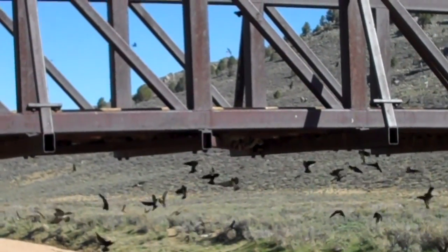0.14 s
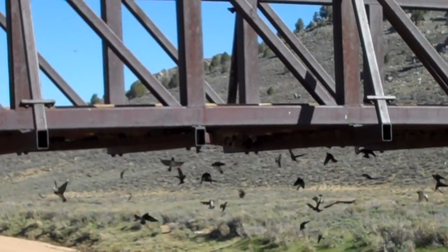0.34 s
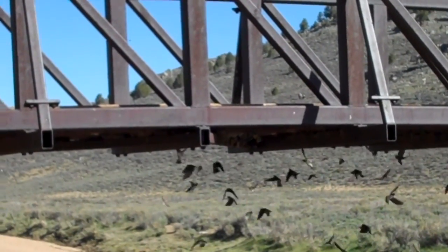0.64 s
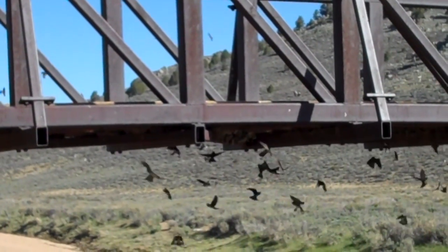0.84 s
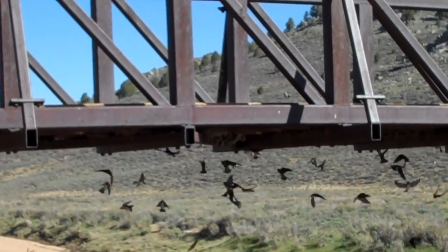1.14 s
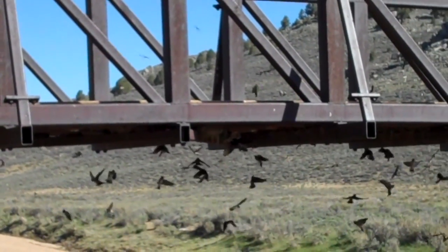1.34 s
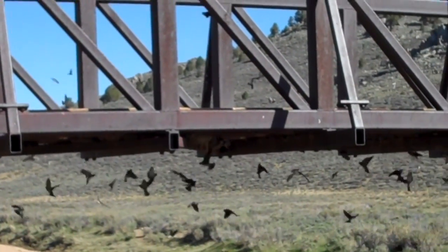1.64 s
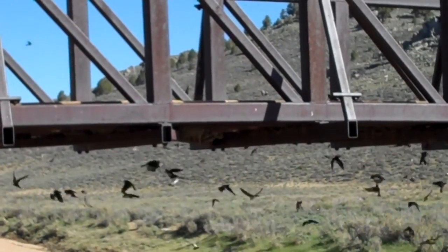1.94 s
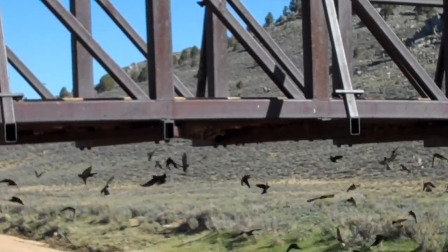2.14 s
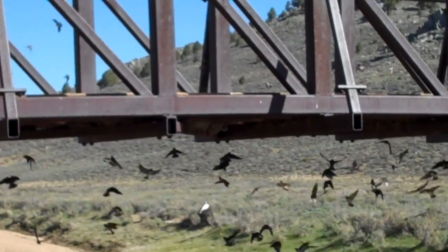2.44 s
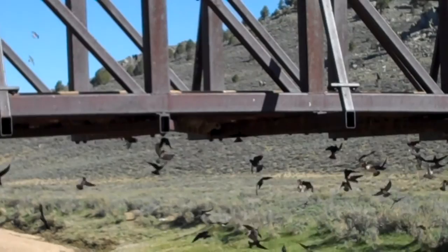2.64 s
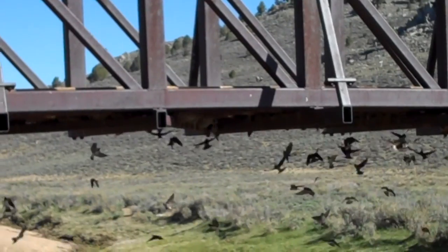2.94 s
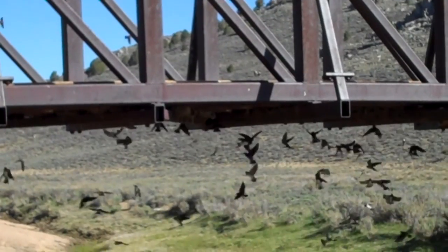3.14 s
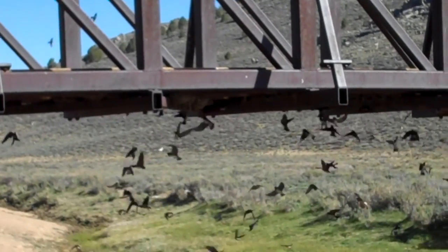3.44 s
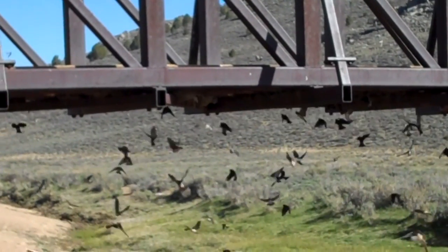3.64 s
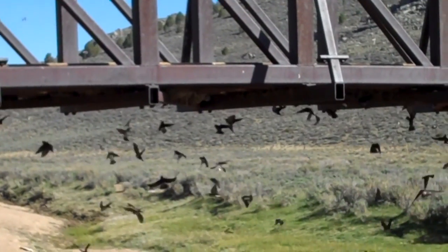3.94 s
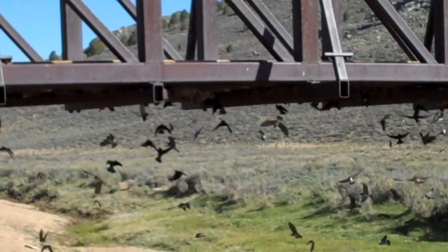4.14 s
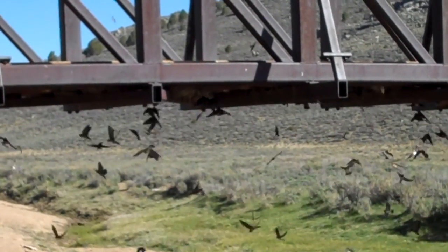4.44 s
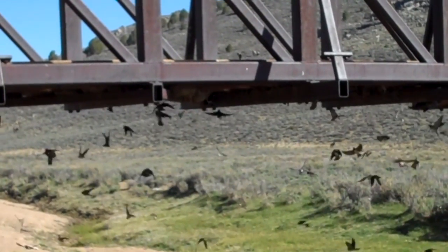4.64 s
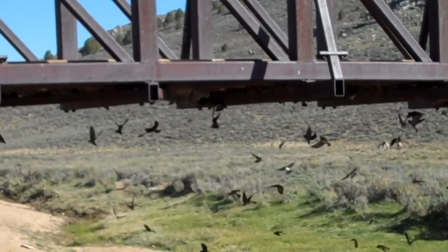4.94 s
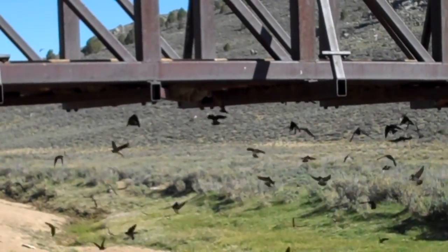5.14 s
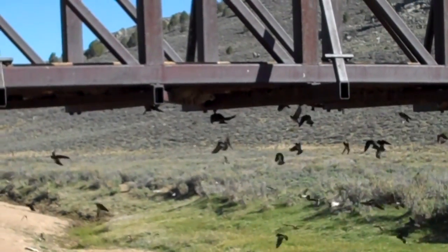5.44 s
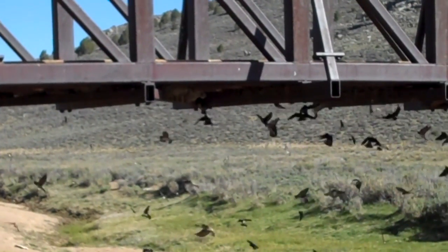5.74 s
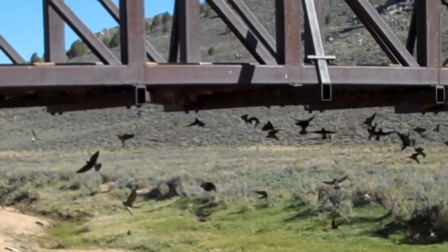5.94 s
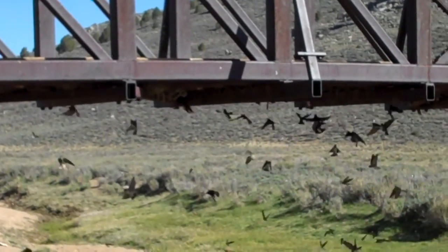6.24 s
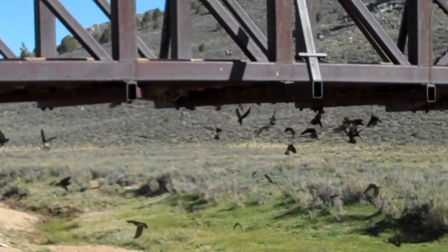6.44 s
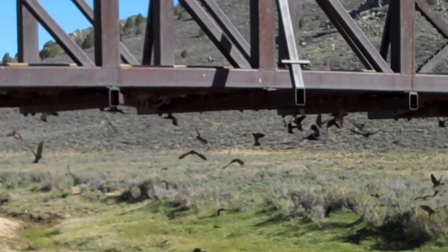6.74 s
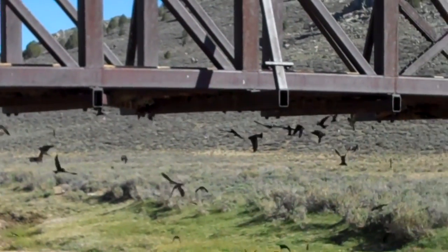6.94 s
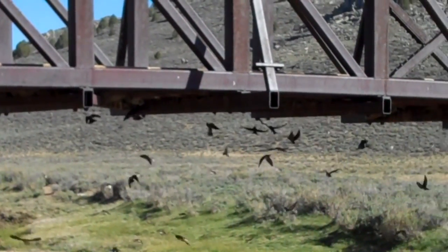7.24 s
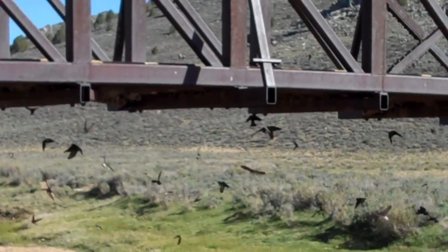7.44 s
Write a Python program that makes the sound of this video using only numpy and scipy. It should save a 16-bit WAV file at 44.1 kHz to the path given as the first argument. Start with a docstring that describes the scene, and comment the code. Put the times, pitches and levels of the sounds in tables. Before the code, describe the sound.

Dozens of swallows squeak, rasp and chirp all at once beneath a metal bridge, with faint ticks and light metallic tinks among them.

```python
"""Rasping calls of nearby cliff swallows stand over the chatter of a colony nesting under a steel bridge.
Each caller sounds both sides of its syrinx: two falling voices, their combination tones and a rough hiss.
One-voiced peeps, whines and chirps, a flock of shorter calls over shaped noise, and faint low notes fill in.
Noise-burst ticks, metallic tinks and one low knock punctuate; the girders echo the birds, ticks and tinks.
A soft outdoor rush of shaped noise lies beneath; both channels are the same."""
import sys
import numpy as np
from scipy import signal
from scipy.fft import rfft, irfft, next_fast_len
from scipy.io import wavfile
from scipy.ndimage import map_coordinates

SR = 44100
rng = np.random.default_rng(int(sys.argv[2]) if len(sys.argv) > 2 else 0)


def wav_record(signal):
    """Record a signal, one row per channel, as 16-bit PCM in the file named by sys.argv[1]."""
    frames = np.transpose(np.atleast_2d(signal))
    bounded = np.clip(frames, -1, 1)
    # unit amplitude maps onto the largest positive 16-bit level
    quanta = np.round(bounded * 32767).astype(np.int16)
    wavfile.write(sys.argv[1], SR, quanta)


N = 335050
TOP_HZ = 13930  # upper band limit


def amp(db):
    """Decibels to gain."""
    return 10 ** (np.asarray(db) / 20)


def unit(x):
    """Scale to rms 1."""
    return x / np.sqrt(np.mean(x ** 2) + 1e-20)


def along(points, hz):
    """(Hz, value) points interpolated on a log-frequency axis."""
    point_hz, values = np.transpose(points)
    return np.interp(np.log(hz + 1), np.log(point_hz), values)


def wobble(rate_hz, n):
    """Smooth random curve of n samples with rate_hz knots a second."""
    knots = rng.standard_normal(int(n * rate_hz / SR) + 4)
    return map_coordinates(knots, [np.arange(n) * rate_hz / SR])


def filtered(x, response):
    """Multiply the spectrum of x by a response of frequency."""
    size = next_fast_len(len(x) + 8192)
    spectrum = rfft(x, size) * response(np.fft.rfftfreq(size, 1 / SR))
    return irfft(spectrum, size)[:len(x)]


def noise(spectrum):
    """Coloured noise of rms 1."""
    white = rng.standard_normal(N)
    return unit(filtered(white, lambda hz: amp(along(spectrum, hz))))


def add(track, start_s, sound):
    """Mix a sound into the track, trimmed to its ends."""
    i = round(start_s * SR)
    part = sound[max(-i, 0):max(N - i, 0)]
    track[max(i, 0):max(i, 0) + len(part)] += part


def air_pressure(length_s, peak):
    """Note progress u (0-1, soft overhangs) and driving pressure, rms 1 over length_s."""
    u = np.arange(-.1, 1.1, 1 / (length_s * SR))
    swell = np.interp(u, [-.1, .06, np.clip(peak, .2, .8), .94, 1.1], [0, .6, 1, .6, 0])
    return u, swell / np.sqrt(np.sum(swell ** 2) / (length_s * SR))


def glide(mid_hz, rise_oct, arch_oct=0):
    """Start, middle and end pitch: a rise in octaves, both ends lowered by the arch."""
    octaves = rise_oct * np.array([-.5, 0, .5]) - arch_oct * np.array([1, 0, 1])
    return mid_hz * 2 ** octaves


def voice(u, glide_hz, jitter):
    """Phase of one side of the syrinx: a parabolic glide through three pitches, with a fast tremble."""
    hz = np.polyval(np.polyfit([0, .5, 1], glide_hz, 2), u)
    trembling_hz = hz * (1 + jitter * wobble(791.0, len(u)))
    return 2 * np.pi * np.cumsum(trembling_hz) / SR


# throat and open-beak resonance: (freq_hz, gain_db)
THROAT_RESONANCE = [(1500, -11.5), (2300, -8.5), (3500, -9.5), (5000, -6), (6200, -12.5), (8000, -12.5),
                    (11000, -10), (14000, -24)]


def partials(phases, levels_db, flutter_db, fade_db=1.76):
    """Sines at given rms: throat resonance shapes each glide, with flutter and slower fades as the bird turns."""
    out = 0
    for phase, db in zip(phases, levels_db):
        hz = np.abs(np.gradient(phase)) * SR / (2 * np.pi)
        throat_db = along(THROAT_RESONANCE, hz)
        motion_db = flutter_db * wobble(423, len(phase)) + fade_db * wobble(53.0, len(phase))
        envelope = unit(amp(throat_db + motion_db))
        out = out + np.sqrt(2) * amp(db) * envelope * np.sin(phase)
    return out


# upper combination tones, in the order of the ladder below: relative level_db
LADDER_LEVELS = [-0.5, -0.5, -4, -6.5, -5.5, -6.5]


def two_voices(u, low_hz, high_hz, levels_db, upper_db, jitter, flutter_db):
    """Coupled syrinx sides: two voices, an octave, a sum tone and a ladder of higher combination tones."""
    low, high = voice(u, low_hz, jitter), voice(u, high_hz, jitter)
    ladder = [3 * low, 2 * high, 2 * low + high, 4 * low, low + 2 * high, 3 * low + high]
    ladder_db = upper_db + np.array(LADDER_LEVELS) + 2 * rng.standard_normal(len(ladder))
    phases = [low, 2 * low, high, low + high, *ladder]
    return partials(phases, [*levels_db, *ladder_db], flutter_db)


def bounced(sound, bounce_db=-11.5):
    """Add a bounce off the nearest girder, 2-13 ms late; on a glide the two beat and roughen the tone."""
    lag = round((.002 + .011 * rng.random()) * SR)
    both = np.pad(sound, (0, lag)) + amp(bounce_db) * np.pad(sound, (lag, 0))
    return both / np.hypot(1, amp(bounce_db))


# two-voiced calls: (start_s, length_s, arch_oct, low_hz, low_fall_oct, high_hz, high_fall_oct,
#                    low_octave_db, high_db, rasp_ref_db); pitches at mid-note
NEAR_CALLS = [(0.0, 0.093, 0.075, 2153, 0.46, 3810, 0.43, -47, -47, -63.5),
              (0.164, 0.12, 0.046, 2250, 0.42, 3670, 0.58, -49.5, -52.5, -65.5),
              (0.184, 0.049, 0.026, 2300, 0.18, 4160, 0.23, -54, -53, -74),
              (0.424, 0.072, 0, 2150, 0.52, 3450, 0.46, -54, -52.5, -57.5),
              (0.6, 0.095, 0.088, 2130, 0.3, 3510, 0.5, -53.5, -55, -84),
              (0.791, 0.096, 0.034, 2090, 0.47, 3550, 0.63, -60, -56, -71),
              (0.943, 0.11, 0.052, 2194, 0.35, 3500, 0.54, -53.5, -60, -65),
              (1.207, 0.096, 0.03, 2120, 0.49, 3540, 0.6, -52.5, -48.5, -63),
              (1.518, 0.12, -0.0013, 1870, 0.2, 3810, 0.43, -56, -66, -77),
              (1.888, 0.11, 0.057, 2150, 0.26, 3790, 0.45, -58, -53.5, -68.5),
              (2.012, .065, 0.026, 2095, .24, 3700, 0.2, -59, -57.5, -79),
              (2.073, 0.089, 0.038, 2206, 0.14, 3700, 0.42, -49, -52, -60),
              (2.323, 0.092, 0.06, 2220, 0.29, 3970, 0.33, -60, -57.5, -68),
              (2.853, .033, .02, 2360, 0.071, 4300, .08, -54, -54, -65.5),
              (2.902, .06, .02, 2014, 0.32, 3780, 0.25, -53, -51.5, -70),
              (2.944, .052, .01, 1740, 0.223, 3270, 0.238, -54, -56, -71),
              (3.203, 0.065, 0.0035, 1940, 0.1, 3390, 0.238, -52.5, -54, -61),
              (3.255, 0.1, 0.0052, 2145, 0.17, 3310, 0.56, -59, -69, -63.5),
              (3.695, 0.088, 0.11, 2304, 0.31, 4180, .28, -57, -49.5, -65.5),
              (3.871, 0.073, 0.03, 2190, 0.037, 3100, 0.37, -62, -53, -60),
              (3.903, 0.099, 0.034, 2057, 0.096, 3590, 0.4, -54, -56, -70),
              (4.251, 0.074, 0.011, 2330, .25, 4190, 0.19, -54, -58, -73),
              (4.31, 0.096, 0.11, 2147, 0.34, 3966, 0.38, -58, -50.5, -67),
              (4.757, .08, .05, 2250, 0.16, 3150, 0.196, -55.5, -62, -62),
              (5.022, 0.057, 0.024, 2140, 0.23, 4120, 0.21, -62, -54.5, -69),
              (5.229, 0.092, 0.11, 2370, 0.29, 4020, 0.42, -57, -56, -68),
              (5.522, 0.072, 0.047, 2147, 0.21, 3560, .3, -57, -68, -61),
              (5.895, .075, 0.065, 2360, 0.21, 4150, 0.3, -54, -58, -67),
              (6.072, 0.055, 0.024, 2540, 0.28, 4550, 0.36, -58, -51, -66),
              (6.214, 0.08, 0.023, 1980, 0.2, 3880, 0.33, -66, -62, -67),
              (6.308, 0.068, 0.093, 2400, 0.15, 3820, 0.42, -51.5, -57, -70),
              (6.477, 0.063, 0.043, 2166, 0.19, 3700, 0.52, -58, -61, -70),
              (6.864, 0.054, 0.04, 2280, 0.22, 3720, 0.3, -62, -53.5, -76),
              (7.093, 0.093, .011, 2137, 0.35, 3740, .28, -56, -61, -70)]
# hiss spectrum of a call: (freq_hz, relative db_per_hz)
RASP_SPECTRUM = [(1000, -16.5), (2200, -1), (4300, 2.5), (6500, -22), (8500, -16), (11000, -13.5),
                 (14000, -38)]


def near_calls(rasp_gain_db=3, ladder_gain_db=-5):
    """Closest birds: two-voiced calls with bursts of syrinx hiss; combination tones grow with rasp and voice."""
    fundamental_db, sum_tone_db = -8.5, -2  # relative to the low octave; to rasp_ref_db
    forced_db, ladder_growth = -46.5, .52  # forced voice level; extra ladder fade below it, dB per dB
    tones, hiss = np.zeros(N), np.zeros(N)
    for (start_s, length_s, arch_oct, low_hz, low_fall_oct, high_hz, high_fall_oct,
         low_octave_db, high_db, rasp_ref_db) in NEAR_CALLS:
        u, pressure = air_pressure(length_s, peak=.47)
        low_glide_hz = glide(low_hz, -low_fall_oct, arch_oct)
        high_glide_hz = glide(high_hz, -high_fall_oct, arch_oct)
        levels_db = [low_octave_db + fundamental_db, low_octave_db, high_db, rasp_ref_db + sum_tone_db]
        softness_db = min(max(low_octave_db, high_db) - forced_db, 0)
        upper_db = rasp_ref_db + ladder_gain_db + ladder_growth * softness_db
        call = two_voices(u, low_glide_hz, high_glide_hz, levels_db, upper_db, jitter=.004, flutter_db=2.6)
        onset_s = start_s + u[0] * length_s
        add(tones, onset_s, bounced(pressure * call))
        add(hiss, onset_s, pressure * amp(rasp_ref_db))
    bursts = unit(amp(3.5 * wobble(500, N)))
    return tones + amp(rasp_gain_db) * hiss * bursts * noise(RASP_SPECTRUM)


# flock surges and pauses, before mixing and random swell: (time_s, level_db)
FLOCK_LEVEL = [(0.0, -50), (.33, -52.5), (.55, -53.5), (.72, -51), (.87, -50.5), (1.15, -51.5), (1.36, -52),
               (1.6, -52), (1.66, -56), (1.78, -52), (2.1, -54), (2.25, -56.5), (2.36, -56), (2.58, -54.5),
               (2.76, -50), (2.82, -52.5), (2.97, -52), (3.13, -55), (3.3, -49), (3.6, -52.5), (3.97, -50),
               (4.13, -52.5), (4.36, -48), (4.44, -52), (4.52, -49.5), (4.68, -51), (4.82, -48), (4.9, -50),
               (5.08, -51), (5.17, -52.5), (5.3, -50.5), (5.42, -50.5), (5.52, -52), (5.76, -51.5),
               (5.86, -51), (6.08, -53), (6.14, -54.5), (6.36, -48.5), (6.43, -52), (6.52, -52),
               (6.61, -55.5), (6.72, -51.5), (6.81, -54.5), (6.88, -52.5), (7.03, -51.5), (7.42, -52),
               (7.6, -52.5)]
# blended far voices: (freq_hz, relative db_per_hz)
CHATTER_SPECTRUM = [(710, -50), (1200, -17), (1430, 0), (1680, -6), (2720, 3), (4170, -2.5), (5170, -7.5),
                    (7230, -15), (10300, -17), (13800, -25)]


def flock(count, spread_db=.1, pitch_spread=.13, swell_db=1):
    """Farther birds: shorter, flatter two-voiced scraps, each at its own pitch; the farthest are a noise wash."""
    out = np.zeros(N)
    starts_s = (np.arange(count) + rng.random(count)) / count * (N / SR + .05) - .05
    traits = rng.standard_normal((count, 6))
    for start_s, (size, span, pitch, split, fall, lean) in zip(starts_s, traits):
        u, pressure = air_pressure(.032 * np.exp(.35 * span), .4 + .15 * lean)
        tension = np.exp(pitch_spread * np.clip(pitch, -2, 1.2))
        sweep = .17 + .22 * fall
        low_hz = 2300 * tension * np.array([1.08, 1, .87]) ** sweep
        high_hz = 3350 * tension * np.exp(.09 * split) * np.array([1.16, 1, .82]) ** sweep
        levels_db = np.array([-5.5, -1.0, 1.3, -6.5]) + 1.7 * rng.standard_normal(4)
        call = two_voices(u, low_hz, high_hz, levels_db, upper_db=-15.5, jitter=.014, flutter_db=4.5)
        add(out, start_s, amp(spread_db * np.clip(size, -2, 1)) * pressure * call)
    surge_db = np.interp(np.arange(N) / SR, *np.transpose(FLOCK_LEVEL))
    level = amp(surge_db + swell_db * wobble(25, N))
    return level * (.78 * unit(out) + .52 * noise(CHATTER_SPECTRUM))


# outdoor rush: (freq_hz, relative db_per_hz)
RUSH_SPECTRUM = [(20, 2), (60, -3), (150, -6.5), (280, -8), (480, -2), (750, -1.5), (1050, 2), (1600, -1),
                 (3000, -2.5), (10000, -39), (14000, -39)]


def outdoor_rush(level_db=-62.5):
    """Steady noise shaped to a soft outdoor rush."""
    return amp(level_db) * noise(RUSH_SPECTRUM)


# echo decay under the bridge: (freq_hz, t60_s)
BRIDGE_DECAY = [(500, 0.39), (3000, 0.25), (10000, 1)]


def girders(x, echo_db=-10):
    """Bridge underside: a short, dense echo about 3 ms late, decaying noise with a t60 per frequency."""
    hz, t, cells = signal.stft(rng.standard_normal(SR // 2), SR, nperseg=256)
    decay = amp(-60 * t / along(BRIDGE_DECAY, hz)[:, None])
    tail = signal.istft(cells * decay, SR, nperseg=256)[1]
    late_tail = np.pad(tail / np.linalg.norm(tail), (SR // 300, 0))
    return x + amp(echo_db) * signal.fftconvolve(x, late_tail)[:N]


def low_notes(count, centre_hz=1180, level_db=-74):
    """Faint, nearly level sines from all over the colony, at random times and pitches."""
    out = np.zeros(N)
    starts_s = rng.random(count) * N / SR
    for start_s, (span, pitch, sweep) in zip(starts_s, rng.standard_normal((count, 3))):
        u, pressure = air_pressure(.09 * np.exp(.3 * span), .35)
        bend = .025 * (1 + sweep) * np.array([-1, 0, 1])
        glide_hz = centre_hz * np.exp(.22 * np.clip(pitch, -2, 1.5) + bend)
        add(out, start_s, pressure * np.sin(voice(u, glide_hz, jitter=.008)))
    return amp(level_db) * unit(out)


def one_voice(notes, peak, harmonics_db):
    """One syrinx side alone: short notes sharing a swell shape and overtone levels."""
    out = np.zeros(N)
    for start_s, length_s, mid_hz, rise_oct, arch_oct, level_db in notes:
        u, pressure = air_pressure(length_s, peak)
        phase = voice(u, glide(mid_hz, rise_oct, arch_oct), jitter=.005)
        orders = [k for k in range(1, len(harmonics_db) + 1) if k * mid_hz < TOP_HZ]
        note = partials(np.outer(orders, phase), level_db + np.array(harmonics_db), flutter_db=2.6)
        add(out, start_s + u[0] * length_s, bounced(pressure * note))
    return out


# nearly pure peeps and slurs: (start_s, length_s, mid_hz, rise_oct, arch_oct, level_db)
PEEP_NOTES = [(.06, .032, 8050, 0.5, 0, -64), (.14, 0.076, 7330, -0.14, 0.07, -63.5),
              (.397, .105, 5850, -0.72, -0.037, -54), (.398, 0.023, 4550, -0.34, 0, -52),
              (.43, .055, 2150, -0.32, 0, -57), (.505, 0.016, 3700, 0, 0.029, -57),
              (.7, .025, 6600, 0, 0.0079, -58.5), (.71, 0.031, 2550, -.3, -0.0049, -56),
              (.72, 0.063, 5200, -0.14, .04, -55), (.803, 0.018, 2620, 0.17, 0.018, -49),
              (.852, .03, 3400, -.25, 0, -52.5), (.935, .013, 7340, -.12, 0, -55.5),
              (.96, 0.053, 3500, -.17, 0, -58), (1.005, 0.053, 3650, -0.4, 0, -54),
              (1.08, .027, 4150, -.07, 0, -49.5), (1.17, 0.024, 5850, .15, 0, -59),
              (1.205, 0.066, 6000, -0.73, 0.0087, -53.5), (1.26, .03, 1950, -.22, 0, -55),
              (1.29, 0.014, 5200, 0, 0, -48.5), (1.342, 0.0097, 4500, .15, 0, -48),
              (1.405, 0.015, 2680, -0.07, 0.0043, -49.5), (1.66, 0.084, 2570, -0.35, -0.024, -58.5),
              (1.67, 0.032, 3890, 0.2, -0.0086, -53), (1.803, .02, 4990, 0.1, -0.013, -55),
              (1.925, .047, 4280, -0.1, 0.026, -56), (2.118, 0.075, 5230, -.42, .07, -52.5),
              (2.165, .035, 2780, -.2, -0.013, -59), (2.39, .068, 3090, -.42, -.02, -58),
              (2.56, 0.083, 2920, -0.23, -0.013, -57), (2.635, .035, 4500, -0.5, -.05, -62),
              (2.68, 0.071, 3290, -0.2, 0.042, -52), (2.745, 0.026, 2187, .04, 0.043, -51.5),
              (3.075, 0.03, 5360, -0.4, 0, -58), (3.38, 0.097, 3350, -.09, 0, -57),
              (3.635, .035, 4200, -.12, 0, -52), (3.77, 0.13, 3100, -0.35, -.05, -55),
              (4.0, .085, 2700, -0.08, 0, -56), (4.21, .043, 2760, -0.02, 0, -55),
              (4.26, .042, 3500, -0.02, .04, -50), (4.303, .033, 3130, -0.25, 0, -50),
              (4.46, .022, 2740, -0.07, .03, -51.5), (4.612, 0.058, 3830, -0.22, 0.15, -51),
              (4.675, .045, 2980, -0.15, 0, -55), (4.72, 0.042, 3940, .25, .04, -53.5),
              (4.815, .025, 3760, 0.2, 0, -55), (4.88, .02, 6400, .15, 0, -59),
              (4.94, .02, 6500, .2, 0, -60), (4.94, .035, 3840, -.13, 0, -54),
              (5.01, 0.097, 2890, -0.16, 0, -57.5), (5.03, 0.039, 6970, -.18, .02, -64),
              (5.06, .03, 2560, -0.2, -0.015, -58), (5.305, 0.019, 2610, -.05, 0, -51.5),
              (5.355, 0.039, 3520, -0.14, .02, -59), (5.443, .032, 4100, -0.04, 0, -50),
              (5.465, 0.04, 3520, 0.26, 0, -56), (5.5, .06, 4640, 0.06, .06, -52),
              (5.507, 0.054, 4045, 0.35, .1, -46.5), (5.52, .08, 5560, -.45, .08, -58),
              (5.96, .045, 4170, -.14, -0.01, -57), (5.975, 0.058, 3120, -0.32, -0.025, -49),
              (6.03, .035, 4220, -0.2, 0, -52.5), (6.04, .065, 2480, -.26, 0.015, -53),
              (6.065, 0.013, 8000, -0.14, 0.012, -48.5), (6.245, .026, 5850, 0, .02, -55),
              (6.355, 0.044, 4010, 0.15, .08, -55), (6.47, .06, 3320, -.08, 0.014, -57),
              (6.48, 0.043, 2800, -0.23, 0, -55), (6.635, .04, 3300, -0.2, .02, -57),
              (6.83, .022, 4250, .2, 0, -57), (7.09, .038, 3370, 0, -0.0062, -57),
              (7.33, .14, 2770, -.26, 0, -56), (7.545, .06, 3920, -0.42, -.06, -50.5)]


def peeps():
    """Nearly pure notes: overtones lie at least 24 dB under the fundamental's set level."""
    return one_voice(PEEP_NOTES, peak=.31, harmonics_db=[0, -24, -25])


# low, reedy whines: (start_s, length_s, mid_hz, rise_oct, level_db)
WHINE_NOTES = [(0.102, 0.27, 764, 0.2, -82), (.68, 0.11, 1870, 0.058, -63), (0.797, 0.24, 780, 0.087, -83),
               (1.094, 0.14, 1187, 0.68, -77), (1.891, 0.16, 1410, 0.35, -75),
               (2.254, 0.076, 1976, 0.32, -66.5), (2.329, 0.041, 947, -0.027, -64.5),
               (2.58, 0.13, 1390, 0.21, -69), (2.799, 0.089, 996, 0.11, -70),
               (2.976, 0.084, 2013, 0.097, -65), (3.34, 0.15, 811, 0.02, -69.5),
               (4.529, 0.036, 1630, 0, -68), (4.711, 0.14, 1400, 0.28, -67), (4.718, 0.04, 1954, 0.38, -62),
               (5.02, .11, 1490, 0.23, -69.5), (5.431, 0.085, 1884, 0.017, -60.5),
               (5.596, 0.077, 1520, 0.3, -69), (5.602, 0.068, 1995, 0.022, -64),
               (5.973, 0.066, 2040, 0.081, -60), (6.211, .09, 1990, -0.12, -61.5),
               (6.324, 0.085, 2430, -0.3, -62.5), (6.482, 0.055, 1357, 0.22, -62.5),
               (6.578, 0.053, 1440, 0.07, -66), (6.765, 0.067, 1370, 0.12, -69),
               (6.922, 0.057, 1318, 0.13, -64), (7.045, 0.1, 1694, 0.15, -70),
               (7.121, 0.098, 1394, 0.22, -67.5), (7.41, 0.066, 1256, 0.0065, -67),
               (7.49, 0.057, 1047, -0.093, -69.5)]


def whines():
    """Low, reedy notes: four strong harmonics on a straight glide with no arch."""
    notes = [(start_s, length_s, mid_hz, rise_oct, 0, level_db)
             for start_s, length_s, mid_hz, rise_oct, level_db in WHINE_NOTES]
    return one_voice(notes, peak=.48, harmonics_db=[4.5, -1.5, -6.5, -12.5])


# steep falling chirps: (start_s, length_s, mid_hz, level_db)
CHIRP_NOTES = [(0.266, 0.053, 2890, -61.5), (0.983, 0.059, 2630, -52.5), (1.96, .035, 2640, -60),
               (2.442, 0.05, 2530, -58), (2.858, 0.032, 2540, -53.5), (3.168, 0.04, 2590, -55),
               (3.261, 0.064, 2770, -60), (4.347, 0.046, 2640, -54.5), (4.765, 0.035, 2650, -58),
               (5.187, 0.029, 2650, -55), (5.28, 0.046, 2720, -55), (5.849, 0.04, 2530, -59),
               (6.009, 0.049, 2830, -57), (6.859, .04, 2610, -60), (7.063, 0.095, 2300, -64),
               (7.174, 0.07, 2500, -61), (7.372, 0.061, 2600, -55.5)]


def chirps(fall_oct=.38, arch_oct=-.0331):
    """Steep falls whose octave is about as strong as the fundamental, loudest late."""
    notes = [(start_s, length_s, mid_hz, -fall_oct, arch_oct, level_db)
             for start_s, length_s, mid_hz, level_db in CHIRP_NOTES]
    return one_voice(notes, peak=.8, harmonics_db=[-.5, 0, -14.5, -18])


# short bright ticks: (start_s, relative level_db)
TICK_STROKES = [(1.521, -55), (2.593, -59), (2.738, -61), (3.015, -56), (5.597, -58), (5.677, -57),
                (6.2984, -56), (6.548, -57)]


def ticks(t60_s=.078, gain_db=-5):
    """Tiny bright snaps: decaying noise bursts, shaped to peak near 4 kHz."""
    out, t = np.zeros(N), np.arange(SR // 20) / SR
    for start_s, level_db in TICK_STROKES:
        decay = amp(level_db + gain_db - 60 * t / t60_s)
        add(out, start_s, decay * rng.standard_normal(len(t)))
    brightness = [(1000, -17), (4000, 17.5), (10000, 12.5), (14000, 1)]  # (freq_hz, gain_db)
    return filtered(out, lambda hz: amp(along(brightness, hz)))


# metallic tinks: (start_s, relative level_db)
TINK_STROKES = [(2.594, -48.5), (2.738, -50), (3.016, -54)]
# their ring: (freq_hz, relative level_db, t60_s)
RING_MODES = [(2240, -3, 0.08), (5060, -1, .08), (7450, -3, 0.07), (9150, -6, 0.07), (10370, -3, 0.11)]


def tinks(attack_s=.0015, tremble=.0015):
    """Thin metallic rings: decaying, slightly unsteady modes whose balance varies by stroke."""
    out, t = np.zeros(N), np.arange(SR // 4) / SR
    for start_s, stroke_db in TINK_STROKES:
        ring = 0
        for hz, mode_db, t60_s in RING_MODES:
            decay = amp(mode_db + 2 * rng.standard_normal() - 60 * t / t60_s)
            ring = ring + decay * np.sin(voice(t, [hz] * 3, tremble))
        add(out, start_s, amp(stroke_db) * (1 - np.exp(-t / attack_s)) * ring)
    return out


def knock(centre_s=3.1775, width_s=.0018, peak_db=-52):
    """One soft, low knock: a single pulse shaped as a Gaussian's second derivative."""
    out, u = np.zeros(N), np.arange(-SR // 50, SR // 50) / SR / width_s
    add(out, centre_s + u[0] * width_s, amp(peak_db) * (u ** 2 - 1) * np.exp(-u ** 2 / 2))
    return out


def scene():
    """Echoing birds, ticks and tinks over the echo-free rush and knock, the same in both channels."""
    birds = near_calls() + flock(count=520) + low_notes(count=70) + peeps() + whines() + chirps()
    mono = girders(birds + ticks() + tinks()) + outdoor_rush() + knock()
    return np.array([mono, mono])


def record(dry):
    """Cut everything above the band limit and shift the waveform slightly below zero."""
    dc_offset = -.0004
    return np.array([filtered(channel, lambda hz: hz < TOP_HZ) for channel in dry]) + dc_offset


dry = scene()
out = record(dry)
wav_record(out)
```